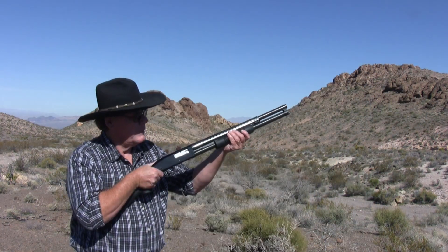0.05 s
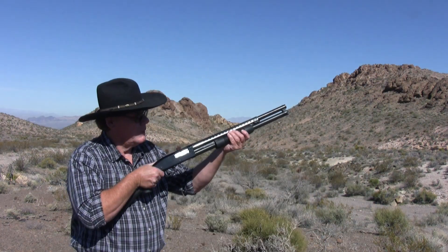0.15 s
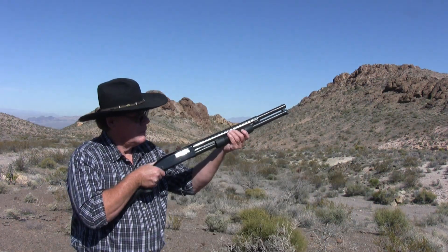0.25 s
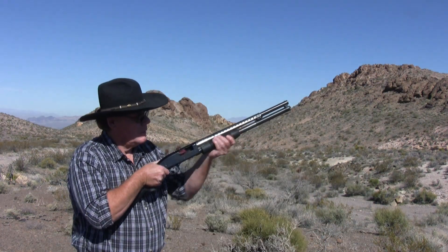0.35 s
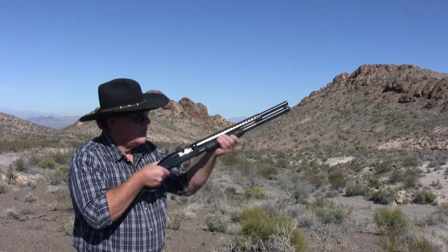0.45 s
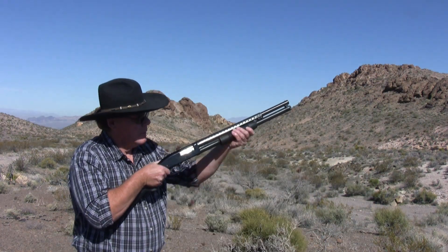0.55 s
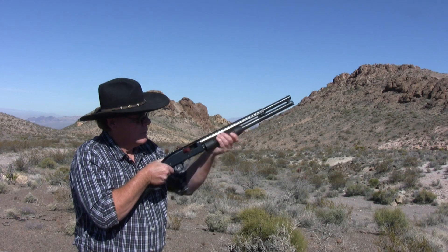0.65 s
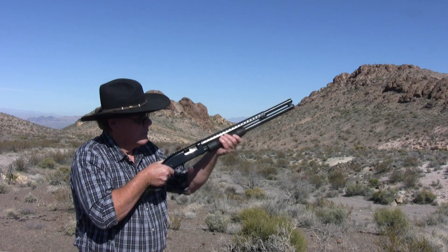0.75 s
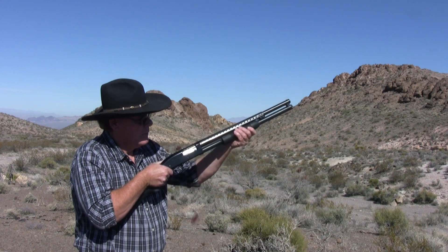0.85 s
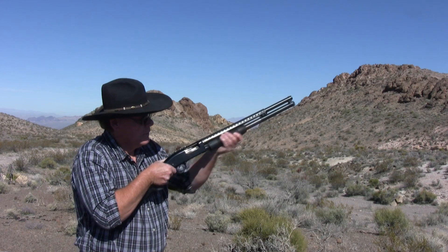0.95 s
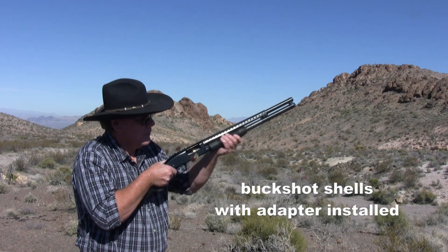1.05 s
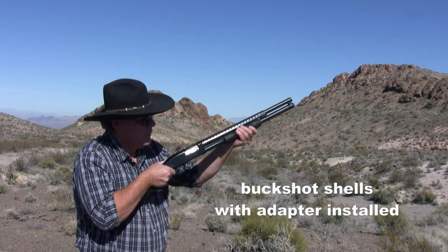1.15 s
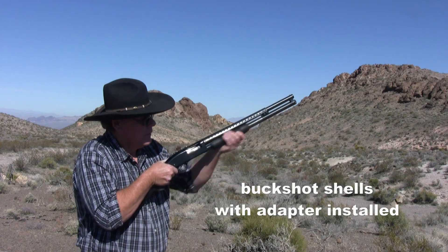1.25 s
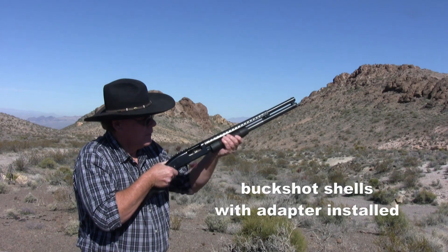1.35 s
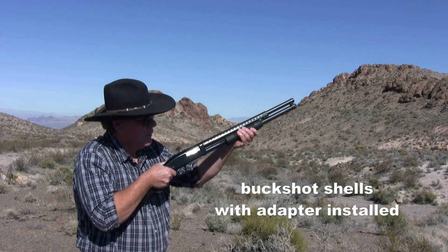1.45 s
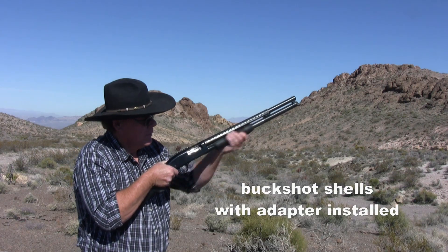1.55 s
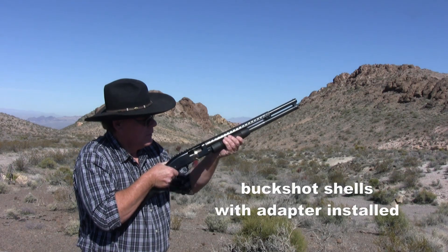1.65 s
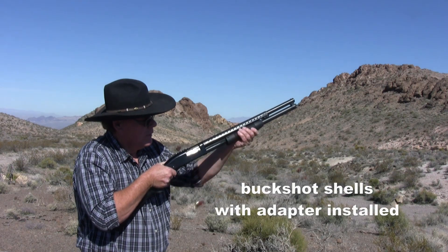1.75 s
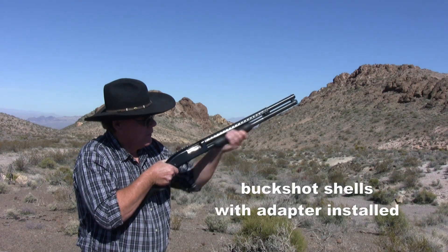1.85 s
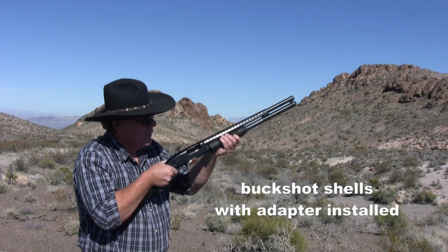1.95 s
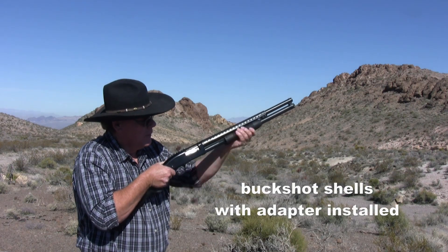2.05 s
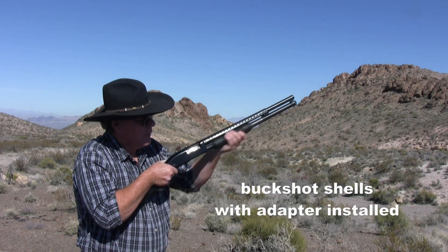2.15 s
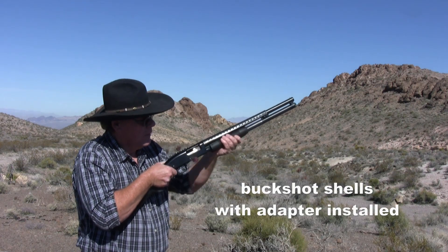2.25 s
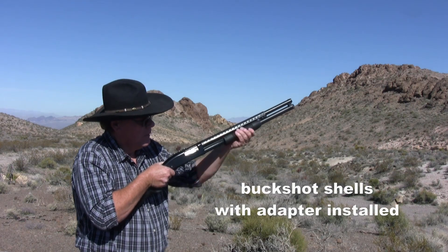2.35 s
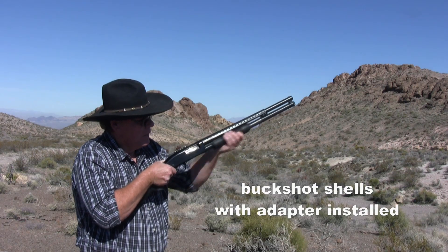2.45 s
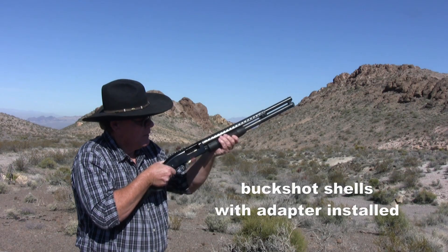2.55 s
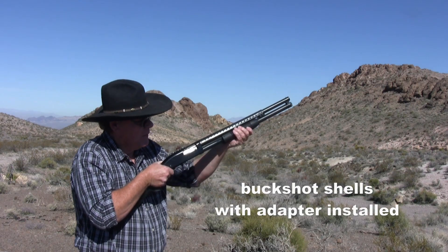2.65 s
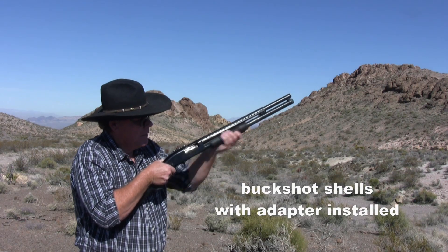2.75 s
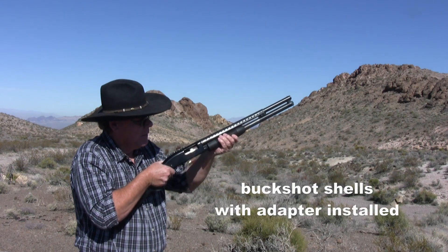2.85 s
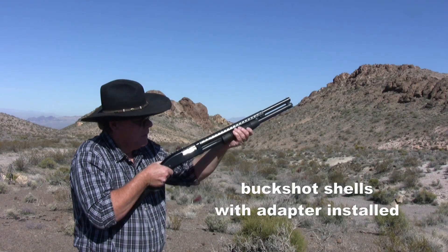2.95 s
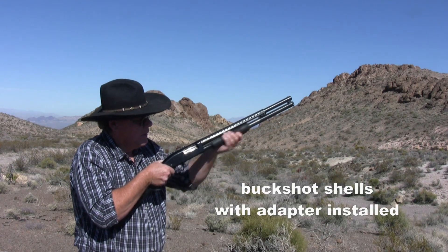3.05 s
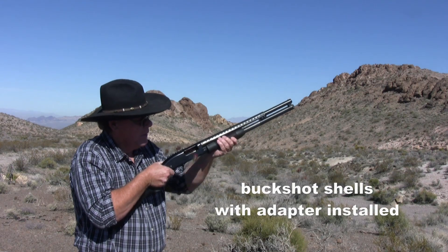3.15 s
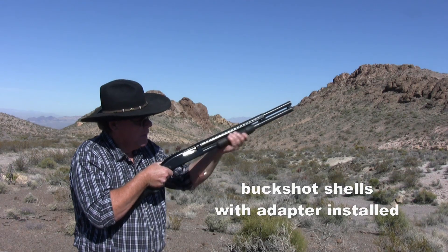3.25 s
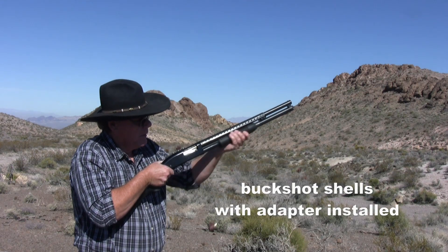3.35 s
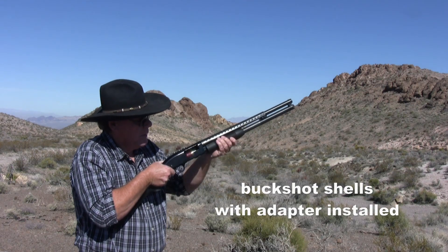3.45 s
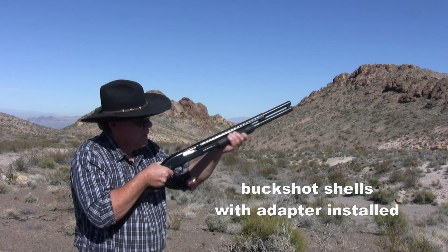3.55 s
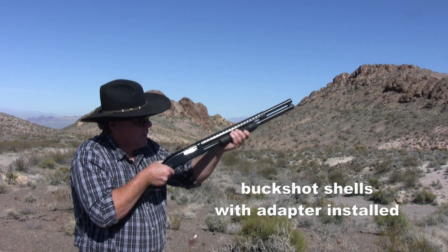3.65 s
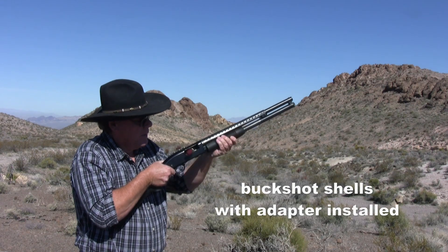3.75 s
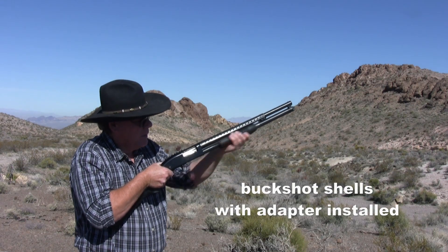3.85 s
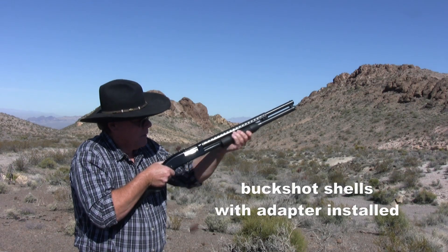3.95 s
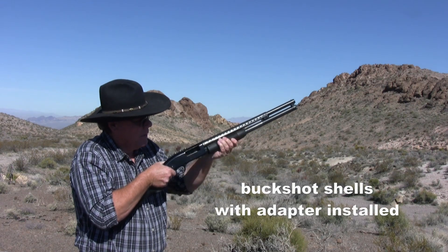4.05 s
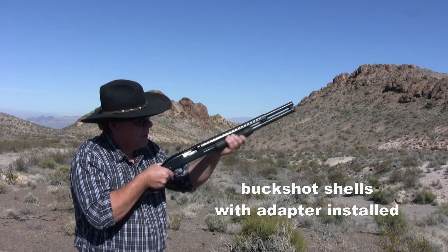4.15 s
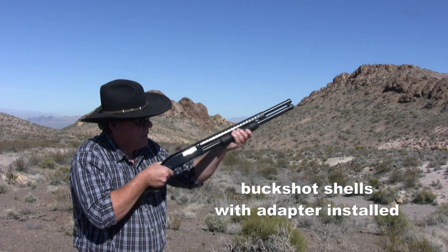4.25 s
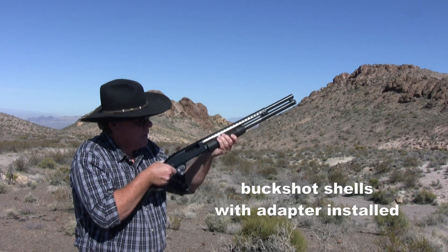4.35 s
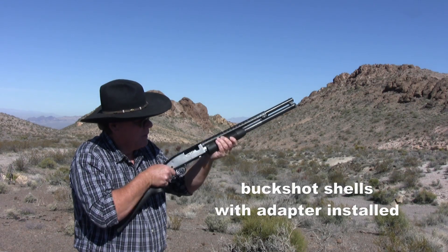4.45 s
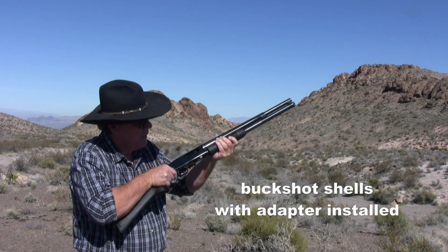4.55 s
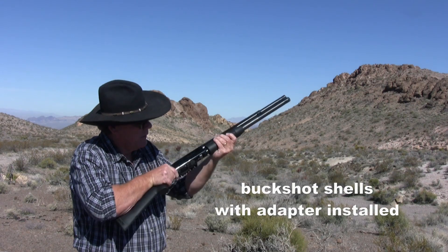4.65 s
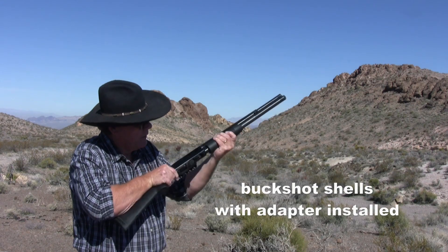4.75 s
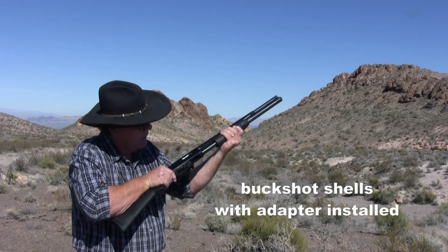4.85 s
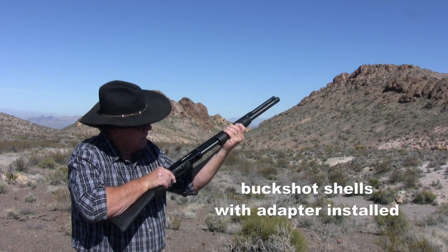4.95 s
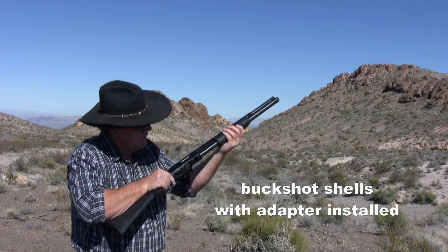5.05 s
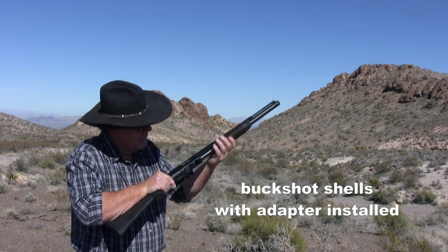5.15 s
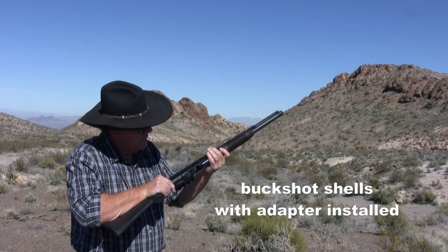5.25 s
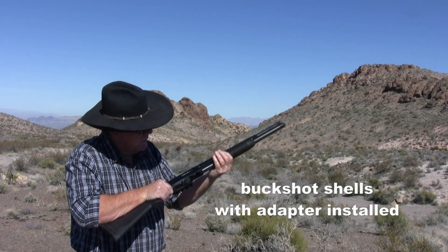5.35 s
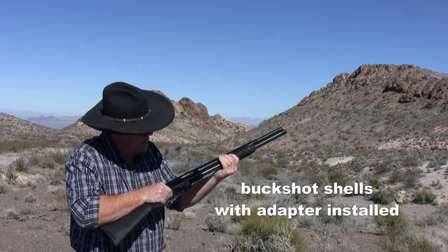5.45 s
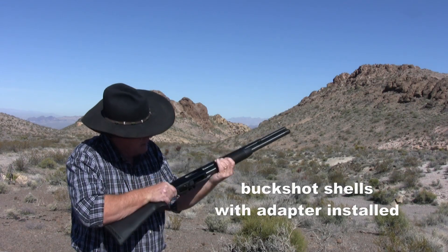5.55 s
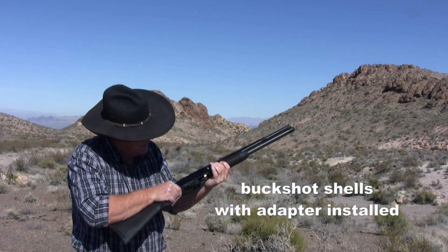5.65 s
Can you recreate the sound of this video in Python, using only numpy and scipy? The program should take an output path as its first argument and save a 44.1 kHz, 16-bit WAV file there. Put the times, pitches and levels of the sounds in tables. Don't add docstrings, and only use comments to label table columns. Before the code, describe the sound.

Low wind rumbles on the microphone for about half a second, with soft grip ticks just before the action starts. From 0.48 seconds a pump shotgun's slide is racked quickly and evenly, roughly every 0.3 seconds. Each pull scrapes and slams into the rear stop with a bright, hard clack and rebound; a shell drops and rattles lightly, then the push home ends in a sharp locking clack with a faint dull stock thud. Eleven such full cycles run until about 3.75, then a twelfth pull and empty strokes clatter on to 4.5. Small ticks and pats follow, a clustered burst of metal clicks and scraping at 4.9-5.06, light touches, and a last cluster around 5.65. The sound is close, dry and slightly clipped, without gunshots or noticeable echo. Hiss and a thin recorder whine sit beneath; wind ducks during racking and swells back near the end.

```python
import sys
import numpy as np
from scipy import signal
from scipy.fft import rfft, irfft
from scipy.io import wavfile
from scipy.ndimage import uniform_filter1d, minimum_filter1d

SR = 44100
rng = np.random.default_rng(int(sys.argv[2]) if len(sys.argv) > 2 else 0)


def generate_wav(sig):
    pcm = np.round(np.clip(np.atleast_2d(sig).T, -1, 1) * 32767).astype(np.int16)
    wavfile.write(sys.argv[1], SR, pcm)


def level_to_linear(level):
    exponent = np.asarray(level, float) / 20
    return 10 ** exponent


N = 250752

# [t/s, wind level/dB, hiss and rustle level/dB]
AIR = [
    (0, -34.5, -56.5),
    (.46, -34, -63),
    (.62, -52, -48),
    (2.1, -57, -45.5),
    (4.4, -56.5, -49),
    (4.7, -47, -63.5),
    (5.14, -46, -56.5),
    (5.3, -38.5, -54),
    (5.56, -40, -52),
    (5.69, -38, -56),
]
# [f/Hz, level/dB per Hz]
WIND = [(12, -68), (20, 7), (81, 2), (240, -14.5), (420, -28.5), (900, -39), (1170, -95)]
# [f/Hz, level/dB per Hz]
HISS = [(150, -12.5), (300, -11.5), (1100, -9.5), (3000, -10.5), (5000, -12.5), (8000, -16.5), (16000, -22)]
MOTOR_HZ = 299.7
MOTOR_ORDERS = range(13, 20)

# [f/Hz, level/dB per Hz]
STEEL = [(180, -27), (300, -17.5), (1280, -7), (2440, -2.5), (4750, -1), (12300, -9.5), (16000, -12.5)]
# [f/Hz, level/dB]
BODY = [(450, -13), (830, -5.5), (1060, 1), (1290, 4), (1480, 2.5)]
# [f/Hz, level/dB]
PARTS = [(2100, 3), (2720, -22), (3750, 9), (4350, -5), (4780, -23), (5500, -11), (8600, 2)]
# [f/Hz, level/dB, t60/s]
BARREL = [(630, -8, .32), (1720, -9, .15), (6760, -5, .35), (7190, -3, .2), (7700, -6, .25)]

# [t/s, knock level/dB, scrape level/dB]
STARTS = [(0.4775, -3.5, -23.5), (0.7880, -7.5, -32.5), (1.0946, -14, -30.5), (1.3984, -13, -37),
          (1.7025, -15, -38.5), (2.0054, -16, -36), (2.3115, -11.5, -40), (2.6118, -19, -38),
          (2.8997, -16, -42), (3.2138, -10.5, -32), (3.5042, -16.5, -45), (3.807, -16, -40)]
# [t/s, unlatch level/dB, cam level/dB]
UNLATCHES = [(0.5059, -8, 8), (0.8116, -5, -2), (1.1185, -10.5, -11), (1.4245, -13, -7), (1.732, -10, -11),
             (2.0317, -11, -8.5), (2.3326, -11, -10), (2.6297, -12, -15), (2.926, -21, -12),
             (3.234, -23, -12.5), (3.5341, -12.5, -14), (3.8365, -11.5, -12)]
# [t/s, stop level/dB, rebound level/dB, rebound delay/ms]
STOPS = [(0.5441, 12.5, 1, 8.9), (0.8407, 5.5, 8, 8.5), (1.1504, 0, 5.5, 7), (1.456, 2.5, 8, 7.8),
         (1.7649, 8.5, 7, 7.9), (2.0635, 5, 11, 7.5), (2.3657, 2, 3, 7.1), (2.6662, -3, 10, 7.7),
         (2.963, 0, -4.5, 9.3), (3.2723, 0, 12, 7), (3.5728, -6, 9.5, 8.1), (3.8800, 0, 5, 9.8)]
# [t/s, drop level/dB, hop level/dB]
DROPS = [(0.59, -11, -15.5), (0.8837, -14.5, -22), (1.1935, -9.5, -21), (1.4995, -13, -14),
         (1.8071, -11, -10.5), (2.1055, -13.5, -16), (2.404, -10, -43), (2.7041, -8.5, -23),
         (2.9999, -8.5, -17), (3.3050, -9, -27), (3.6000, -13, -32)]
# [t/s, catch level/dB, feed level/dB, ramp level/dB]
CATCHES = [(0.6411, -2, -4, -14), (0.958, -8, -7.5, -7.5), (1.264, -8, -7, -5.5), (1.5644, -8, -8, -14),
           (1.8662, -8.5, -6.5, -8), (2.1779, -9, -8, -10), (2.4590, -10.5, -8.5, -7.5),
           (2.7700, -10.5, -10.5, -7.5), (3.0625, -7.5, -7, -7.5), (3.3710, -6.5, -8, -6.5),
           (3.671, -9.5, -7, -11)]
# [t/s, lock level/dB, seat level/dB, scrape level/dB]
LOCKS = [(0.697, 5, -17, -17), (1.0210, 2.5, -5.5, -25), (1.3260, 1.5, -7.5, -24.5),
         (1.6324, -3, -6.5, -26), (1.9328, 5, -7, -24), (2.2398, 3, -7.5, -20.5), (2.528, -4.5, -7.5, -28),
         (2.8379, -3, -7, -24), (3.1323, -1.5, -3.5, -28.5), (3.4365, -3, -6.5, -28.5),
         (3.7410, -6, -8, -26.5)]
THUDS = [-30, -34, -36, -44.5, -38, -35, -38, -39.5, -33.5, -39.5, -38]
CAM_SHARE, SETTLE_S = .3, .0245
HOP_S, HOP_AGAIN_S = .0148, .0245
FEED_SHARE, RAMP_SHARE, SEAT_S = .385, .815, .0072
LOADED = 22

# (level above its stroke/dB, loudest ring f/Hz, receiver body level/dB)
START, UNLATCH, CAM = (0, 3650, -28), (0, 4600, -30), (0, 3920, -31)
STOP, REBOUND, SETTLE = (0, 4900, -14), (0, 4850, -17), (-24, 3600, -26)
DROP, HOP, HOP_AGAIN = (0, 5200, -34), (-3, 6500, -37), (-3, 5100, -18)
CATCH, FEED, RAMP = (0, 5130, -28), (0, 3250, -20), (0, 4500, -25)
LOCK, SEAT = (0, 6870, -10), (0, 4400, -12)
RING_SPREAD = 0.063

# [t/s, peak level/dB, loudest ring f/Hz]
EMPTY = [(3.948, -25, 4480), (3.9613, -27, 4090), (3.9749, -9, 4300), (3.996, -11, 3700),
         (4.0192, -2, 4850), (4.0282, 7, 5100), (4.035, -5, 3000), (4.082, -28, 2990), (4.098, -21, 4500),
         (4.109, -17, 4700), (4.1267, -12, 4900), (4.1525, -13, 4160), (4.174, 8.5, 7080),
         (4.181, -1, 5500), (4.2646, -22.5, 2340), (4.275, -22, 4000), (4.289, -9.5, 3240),
         (4.3123, -7, 2900), (4.337, -5.5, 5460), (4.342, -9, 7500), (4.346, -5, 6300), (4.352, -4.5, 6230),
         (4.385, -27, 3230), (4.3935, -33, 6550), (4.416, -27, 8800), (4.426, -13.5, 7000),
         (4.442, -17, 5300), (4.454, -20, 3700), (4.467, -12.5, 3870), (4.48, -16, 2940),
         (4.4981, -3.5, 4180), (4.5082, -2, 4720)]
# [start t/s, stop t/s, scrape level at start/dB, scrape level at stop/dB]
EMPTY_STROKES = [
    (3.959, 4.04, -32, -25),
    (4.112, 4.185, -29.5, -21.5),
    (4.277, 4.359, -33.5, -25.5),
    (4.407, 4.51, -49, -17),
    (4.915, 4.94, -25.5, -17),
    (4.965, 5.058, -41.5, -17),
    (5.443, 5.451, -60, -37),
    (5.669, 5.678, -17.5, -21.5),
]
# [t/s, level/dB]
EMPTY_LOCKS = [
    (4.185, -42),
    (4.509, -42),
]
# [t/s, peak level/dB, loudest ring f/Hz]
STRAYS = [(0.467, -15, 3630), (0.536, -6.5, 3770), (0.616, -14, 4420), (0.6874, -9, 5000),
          (0.769, -27, 3200), (0.779, -25, 3500), (0.9103, -22, 5580), (0.925, -26, 3000),
          (0.9412, -14.5, 4370), (0.832, -18, 3000), (1.085, -28, 6500), (1.2144, -23, 4630),
          (1.379, -18, 5650), (1.4092, -20, 3060), (1.5562, -11.5, 3640), (1.998, -23, 2890),
          (2.011, -23, 3500), (2.1519, -23, 1460), (2.3076, -12.5, 3600), (2.605, -15, 4340),
          (2.299, -25, 2970), (2.4448, -28, 3380), (2.5945, -43, 2870), (2.7399, -39, 3430),
          (2.948, -28, 3700), (2.89, -27, 2980), (3.097, -11, 4100), (3.2, -13.5, 3440), (3.39, -30, 2830),
          (3.3514, -28, 3500), (3.5125, -19, 4700), (3.649, -27, 3220), (3.862, -21, 3340)]
STRAY_BODY_DB, EMPTY_BODY_DB = -11, -16
PULL_END_DB, PUSH_START_DB = -20.5, -33
PULL_LEAD_S, PUSH_LEAD_S, OVERRUN_S = .001, .026, .003

# [t/s, peak level/dB, loudest ring f/Hz, receiver body level/dB]
HANDLING = [(4.585, -31, 540, -13), (4.6523, -32.5, 5430, -7), (4.719, -39.5, 1220, -4),
            (4.774, -37, 3480, -9), (4.7915, -29, 3940, -11), (4.87, -34.5, 4010, -15),
            (4.88, -25, 3550, -18), (4.8969, -16.5, 3040, -8), (4.932, -3, 3240, -34),
            (4.98, -17, 4070, -1.5), (4.995, -23, 3760, -4), (5.0233, -12, 3000, -20),
            (5.026, -3, 5020, -17), (5.0416, -8, 2950, -9), (5.0467, -5.5, 3640, -16),
            (5.052, -8, 6560, -28), (5.058, -6, 4050, -47), (5.175, -36, 3900, 5),
            (5.199, -25.5, 4120, -12), (5.217, -25, 2840, -5), (5.441, -20.5, 4060, -30),
            (5.453, -16, 3050, -13), (5.6302, -21, 2800, -10), (5.648, -9, 3640, -17),
            (5.6612, -7, 2410, -32), (5.672, -10.5, 4600, -14)]
# [t/s, peak level/dB, loudest ring f/Hz, receiver body level/dB]
TICKS = [
    (.445, -28, 3820, -31),
    (0.4517, -24, 4060, -30),
    (4.572, -49, 700, -12),
    (4.708, -45, 2000, -2),
    (4.727, -48, 8000, -20),
    (4.765, -41, 5540, -19),
    (4.624, -33, 2800, -28),
    (4.812, -38.5, 884, 1),
    (5.159, -39.5, 2360, 0),
    (5.359, -31, 547, -7),
]
SOFT_DB, SOFT_CUT_HZ = -16, 7000

# [t/s, peak level/dB]
JOLTS = [(0.536, -56), (0.587, -49), (0.686, -44.5), (0.79, -47), (0.838, -42), (1.013, -42), (1.106, -45),
         (1.285, -47), (1.378, -46), (1.457, -41), (1.625, -44), (1.734, -50), (1.767, -45), (1.997, -41),
         (2.07, -44), (2.106, -48), (2.312, -47), (2.404, -50), (2.611, -45), (2.702, -46), (2.829, -43.5),
         (3.0, -44.5), (3.215, -49), (3.296, -42), (3.596, -45.5), (3.836, -49), (4.007, -49), (4.116, -51)]
FOREND_HZ, FOREND_T60_S = 238.5, 0.076
# [t/s, peak level/dB, ring f/Hz]
CLANKS = [(0.451, -26.5, 1820), (0.466, -20, 2090), (0.479, -12, 1740), (0.508, -12, 2280),
          (0.544, -7.5, 1310), (0.662, -10, 2090), (0.697, -8, 2260), (0.697, -20, 1296),
          (0.791, -14, 2310), (0.841, -12, 1900), (1.021, -13.5, 1276), (1.151, -4, 1486),
          (1.326, -19, 2280), (1.326, -8.5, 1292), (1.458, -9, 1293), (1.589, -17, 2110),
          (1.618, -30, 2150), (1.633, -10.5, 1286), (1.771, -20, 1560), (1.771, -11.5, 1410),
          (1.893, -15, 2120), (1.932, -11, 1310), (1.997, -28, 1260), (2.065, -10.5, 1437),
          (2.229, -27, 1740), (2.24, -12, 1650), (2.366, -7, 1470), (2.528, -11, 1340), (2.611, -21, 990),
          (2.676, -16, 1430), (2.796, -17, 2080), (2.836, -17, 1365), (2.973, -10.5, 1467),
          (3.088, -17, 1500), (3.118, -16, 1640), (3.132, -10.5, 1278), (3.371, -19, 2010),
          (3.396, -14, 2080), (3.424, -15, 1495), (3.574, -17, 1305), (3.697, -12, 2060), (3.74, -13, 1250),
          (3.88, -9, 1436), (3.973, -15, 2040), (4.019, -14, 1540), (4.181, -19, 1760), (4.181, -8.5, 1470),
          (4.264, -28, 2100), (4.313, -17.5, 1830), (4.337, -23, 2100), (4.508, -13, 1806),
          (4.508, -12, 1775), (4.897, -29, 1700), (4.932, -10, 1720), (5.634, -24, 2250),
          (5.661, -21, 2380)]
CLANK_DB, CLANK_T60_S, CLANK_RISE_S = -4.5, 0.044, 0.00042
# [t/s, peak level/dB, centre f/Hz]
SNAPS = [(4.573, -39, 750), (4.5875, -32, 900), (4.8135, -39, 900), (5.3625, -32, 600), (1.113, -17, 4000),
         (1.116, -8, 3500), (1.998, -9, 3500), (4.6125, -42, 4000), (4.6529, -11.5, 6200),
         (4.657, -29, 6000), (4.6625, -31, 4100), (4.6657, -26, 4000), (4.717, -33, 6000),
         (4.72, -36, 1200), (4.7275, -40, 6500), (4.7715, -27, 5000), (4.7738, -30, 5500),
         (4.7758, -30, 4000), (4.792, -32, 5000), (4.7936, -22, 6540), (4.798, -32.5, 6000),
         (4.808, -36, 5000), (4.9705, -25, 5000), (4.9956, -10, 3900), (5.194, -27, 3000),
         (5.259, -34, 2300)]
SNAP_CYCLES = 0.95
# [t/s, peak level/dB, ring f/Hz]
PINGS = [(0.479, 0, 4460), (0.4907, -13, 3000), (0.5024, -23, 3850), (0.5518, 2, 4570), (0.5665, -12, 4090),
         (0.6278, -13, 4540), (0.6593, -19, 2800), (0.7035, -7, 4800), (0.8626, -24, 2970),
         (0.9498, -13.5, 4100), (1.0282, -13, 3980), (1.1401, -14, 3650), (1.2387, -20, 4220),
         (1.4044, -20, 4690), (1.41, -17, 3140), (1.421, -19, 3270), (1.4653, 2, 4900), (1.584, -23, 3450),
         (1.589, -11, 3540), (1.597, -15, 4690), (2.0512, -16, 3360), (2.1567, -26, 2150),
         (2.1603, -23, 5470), (2.1839, -14, 3680), (2.248, -11.5, 1880), (2.3304, -16, 3100),
         (2.4184, -25, 6680), (2.5416, -14, 2040), (2.5961, -26, 2870), (2.655, -16, 3230),
         (2.7178, -22, 4090), (2.8027, -13.5, 3400), (2.9062, -19, 6850), (2.926, -12, 4180),
         (2.9502, -18, 4900), (2.974, -7, 4630), (3.2153, -14, 5630), (3.2337, -12.5, 5080),
         (3.2964, -16, 2860), (3.319, -21, 2970), (3.38, -28, 2760), (3.4033, -12, 3070), (3.43, -24, 1590),
         (3.51, -19, 6760), (3.5146, -19, 4690), (3.5554, -26, 3680), (3.75, -9.5, 3400),
         (3.908, -13, 7240), (3.913, -17, 2610), (4.117, -21, 4480), (4.1202, -21, 5340),
         (4.1494, -13, 4520), (4.1605, -12, 3460), (4.295, -15, 5860), (4.433, -16, 6680),
         (4.933, -8, 2570), (5.6362, -19, 3640), (5.661, -13, 3530),
         (0.5096, -3, 3600), (0.809, -12, 3080), (.9781, -14, 3490), (1.2211, -15.5, 4380),
          (1.39, -30, 3270), (1.4792, -20, 3830), (1.6937, -26, 4870), (1.7075, -22, 4500),
          (1.7114, -19, 2800), (1.727, -22, 6550), (1.7507, -15, 3740), (2.0863, -17, 3060),
          (2.128, -20, 5600), (2.2534, -16.5, 2660), (2.4453, -19, 3250), (2.6435, -12, 4430),
          (2.6927, -17, 4500), (2.989, -30, 2930), (3.1912, -24, 2440), (3.4941, -29, 2890),
          (3.61, -29, 2630), (3.6966, -13, 3270), (3.7037, -17, 4260), (3.7268, -17, 4390),
          (4.91, -21, 3170)]
PING_RISE_S, PING_T60_S, PING_GRIT = .0004, .009, 1.2
RATTLE_T60_S, RATTLE_RISE_S = .03, .0015
GRAIN_CYCLES, GRAIN_RING_SHARE = 20.7, 0.71


def rms_one(x):
    return x / np.sqrt(np.mean(x ** 2) + 1e-20)


def filtered(x, order, hz, kind):
    return signal.sosfilt(signal.butter(order, hz, kind, fs=SR, output="sos"), x)


def in_time(rows):
    s, *columns = np.transpose(rows)
    return [np.interp(np.arange(N) / SR, s, c) for c in columns]


def samples(s):
    return np.round(s * SR).astype(int)


def drift(rate):
    r = np.exp(-80 * np.pi * rate / SR)
    noise = rng.standard_normal(N // 40 + 2002)
    slow = signal.lfilter([1], [1, -2 * r, r * r], noise)[2000:]
    return np.interp(np.arange(N) / 40, np.arange(len(slow)), rms_one(slow))


def ring(clicks, hz, t60):
    r, w = level_to_linear(-60 / (t60 * SR)), 2 * np.pi * hz / SR
    return signal.lfilter([0, np.sin(w)], [1, -2 * r * np.cos(w), r * r], clicks + 1e-18)


def coloured(x, spectrum):
    hz, db = np.transpose(spectrum)
    bins = np.fft.rfftfreq(N, 1 / SR) + 1
    gain = level_to_linear(np.interp(np.log(bins), np.log(hz), db))
    return rms_one(irfft(rfft(x) * gain, N))


def dying(at, db, t60, rise_s):
    jumps = np.zeros(N)
    jumps[at] = level_to_linear(db)
    lag = np.exp(-1 / (rise_s * SR))
    poles = np.convolve([1, -level_to_linear(-60 / (t60 * SR))], [1, -lag])
    return signal.lfilter([1 - lag], poles, jumps + 1e-18)


def grit(per_s, spread_db):
    sizes = level_to_linear(spread_db * np.minimum(rng.exponential(1, N), 3))
    signs = rng.choice([-1, 1], N)
    return sizes * signs * (rng.random(N) < per_s / SR)


def steel_grains(per_s, spread_db):
    hits = grit(per_s, spread_db)
    part = np.arange(N) % 10
    rings = np.zeros(N)
    for k, hz in enumerate(np.geomspace(1300, 11000, 10)):
        rings += hz * ring(hits * (part == k), hz, GRAIN_CYCLES / hz)
    return coloured(rms_one(hits) + GRAIN_RING_SHARE * rms_one(rings), STEEL)


def air():
    wind_db, hiss_db = in_time(AIR)
    gust = level_to_linear(wind_db + 2.3 * drift(5.2))
    mid, own = (coloured(rng.standard_normal(N), WIND) for _ in range(2))
    wind = gust * (mid * level_to_linear([[-1.6], [1.6]]) + 0.17 * own * [[1], [-1]])
    common, left, right = (coloured(rng.standard_normal(N), HISS) for _ in range(3))
    hiss = level_to_linear(hiss_db + 1.5 * drift(9.5)) * (common + 0.4 * np.array([left, right]))
    t = np.arange(N) / SR
    whine = sum(np.sin(2 * np.pi * (k * MOTOR_HZ * t + rng.random())) for k in MOTOR_ORDERS)
    return wind + hiss + level_to_linear(np.minimum(hiss_db, -63) - 9.0) * whine


def stock(rows):
    s, peak_db, _, body_db = np.transpose(rows)
    puff = rms_one(filtered(rng.standard_normal(N), 2, [220, 1100], "band"))
    puff_db = np.minimum(peak_db + body_db, -36) - 9.0
    return puff * dying(samples(s), puff_db, t60=0.088, rise_s=0.00033)


def forend():
    s, db = np.transpose(JOLTS)
    pushes = np.zeros(N)
    pushes[samples(s)] = level_to_linear(db + 7.0)
    return ring(uniform_filter1d(pushes, size=60, origin=-29), FOREND_HZ, FOREND_T60_S)


def snaps():
    out, t = np.zeros(N + 200), np.arange(-100, 100) / SR
    for s, db, hz in SNAPS:
        i = round(s * SR)
        bell = np.exp(-(2 * t * hz / SNAP_CYCLES) ** 2)
        out[i - 100:i + 100] += level_to_linear(db) * np.cos(2 * np.pi * hz * t) * bell
    return out[:N]


def pings():
    rows = PINGS
    out, t = np.zeros(N + 600), np.arange(-100, 500) / SR
    shape = np.where(t < 0, np.exp(t / PING_RISE_S), level_to_linear(-60 * t / PING_T60_S))
    noise = filtered(rng.standard_normal((len(rows), len(t))), 2, [1300, 8500], "band")
    for (s, db, hz), rough in zip(rows, noise):
        tone = np.sin(2 * np.pi * hz * t)
        out[round(s * SR) - 100:][:len(t)] += level_to_linear(db) * shape * (tone + PING_GRIT * rough)
    return out[:N]


def clanks():
    out, t = np.zeros(N + 2000), np.arange(2000) / SR
    shape = (1 - np.exp(-t / CLANK_RISE_S)) * level_to_linear(-60 * t / CLANK_T60_S)
    for (s, db, hz), (apart, phase) in zip(CLANKS, rng.random((len(CLANKS), 2))):
        upper_hz = hz * (1.08 + 0.17 * apart)
        pair = np.sin(2 * np.pi * hz * t) + 0.49 * np.sin(2 * np.pi * (upper_hz * t + phase))
        out[round(s * SR):][:len(t)] += level_to_linear(db + CLANK_DB) * shape * pair
    return out[:N]


def strokes():
    back = [(start[0] - PULL_LEAD_S, stop[0] + OVERRUN_S, start[2], PULL_END_DB)
            for start, stop in zip(STARTS, STOPS)]
    home = [(catch[0] - PUSH_LEAD_S, lock[0] + OVERRUN_S, PUSH_START_DB, lock[3])
            for catch, lock in zip(CATCHES, LOCKS)]
    return sorted(back + home) + EMPTY_STROKES


def lock_up():
    thuds, strikes = np.zeros((2, N))
    for (_, stop, *_), db in zip(strokes()[1:LOADED:2], THUDS):
        thuds[round((stop - .006) * SR)] = level_to_linear(db)
    for s, db in EMPTY_LOCKS:
        strikes[round(s * SR)] = level_to_linear(db)
    barrel = sum(level_to_linear(db) * ring(strikes, hz, t60) for hz, db, t60 in BARREL)
    push = uniform_filter1d(thuds, size=90, origin=-44) * 30
    thud = ring(push, 195, 0.083) + 0.84 * ring(push, 165, 0.21)
    return level_to_linear(-30.5) * filtered(thud, 2, 130, "high") + barrel


def slide():
    t, level = np.arange(N) / SR, np.zeros(N)
    for start, stop, first_db, last_db in strokes():
        corners = [start - .005, start, stop, stop + 0.036]
        db = np.interp(t, corners, [first_db - 1.0, first_db, last_db, last_db - 36.5])
        level += level_to_linear(db) * (t > start - .005) * (t < stop + .05)
    for back, forward in zip(strokes()[0:LOADED:2], strokes()[1:LOADED:2]):
        level += level_to_linear(-37.5) * (t > back[1]) * (t < forward[0])
    flutter = level_to_linear(2.2 * drift(90))
    scrape = level * flutter * steel_grains(per_s=6000, spread_db=3.5)
    return filtered(scrape, 1, 13000, "low")


def cycles():
    start, start_db, _ = np.transpose(STARTS)
    unlatch, unlatch_db, cam_db = np.transpose(UNLATCHES)
    stop, stop_db, rebound_db, rebound_ms = np.transpose(STOPS)
    drop, drop_db, hop_db = np.transpose(DROPS)
    catch, catch_db, feed_db, ramp_db = np.transpose(CATCHES)
    lock, lock_db, seat_db, _ = np.transpose(LOCKS)
    order = [(START, start, start_db),
             (UNLATCH, unlatch, unlatch_db),
             (CAM, unlatch + CAM_SHARE * (stop - unlatch), cam_db),
             (STOP, stop, stop_db),
             (REBOUND, stop + rebound_ms / 1000, rebound_db),
             (SETTLE, stop + SETTLE_S, 0 * stop),
             (DROP, drop, drop_db),
             (HOP, drop + HOP_S, hop_db),
             (HOP_AGAIN, drop + HOP_AGAIN_S, hop_db),
             (CATCH, catch, catch_db),
             (FEED, catch + FEED_SHARE * (lock - catch), feed_db),
             (RAMP, catch + RAMP_SHARE * (lock - catch), ramp_db),
             (LOCK, lock, lock_db),
             (SEAT, lock + SEAT_S, seat_db)]
    rows = []
    for (above_db, hz, body_db), times, levels in order:
        for s, db in zip(times, levels):
            ring_hz = hz * np.exp(RING_SPREAD * rng.standard_normal())
            rows.append((s, db + above_db, ring_hz, body_db))
    return rows


def knocks(rows, rattle_db):
    s, peak_db, hz, body_db = np.transpose(rows)
    at = np.minimum(samples(s), N - 1)
    luck = rng.standard_normal((len(at), 32))
    steel = coloured(grit(per_s=12000, spread_db=0.5), STEEL)

    crack = rms_one(filtered(steel, 1, 8000, "low"))
    sharp_db = peak_db + 5.9 * np.minimum(np.log2(hz / 2500), 0)
    out = crack * dying(at, np.minimum(sharp_db, 4) - 1.0, t60=0.007, rise_s=0.0003)

    edge = rms_one(filtered(steel, 2, 7500, "high"))
    edge_db = peak_db - 29.0 + 11.0 * np.log2(hz / 4000)
    out += edge * dying(at, edge_db, t60=0.036, rise_s=0.00145)

    rattle = steel_grains(per_s=3500, spread_db=2.0)
    heavy = filtered(rattle, 2, 3300, "low")
    for k, part in enumerate([heavy, rattle - heavy]):
        part_db = 0.81 * np.minimum(sharp_db, 0) + rattle_db + 1.2 * luck[:, 20 + k]
        out += part * dying(at, part_db, RATTLE_T60_S, RATTLE_RISE_S)

    t = np.arange(600) / SR
    for i, db, f in zip(at, peak_db, hz):
        own = level_to_linear(db - 2.5 - 60 * t / 0.011) * np.sin(2 * np.pi * f * t) * (1 - np.exp(-t / 0.00033))
        out[i:i + len(t)] += own[:N - i]

    modes = [(mode, peak_db + body_db - 13.0, .028) for mode in BODY]
    modes += [(mode, peak_db - 30.5, .022) for mode in PARTS]
    for k, ((f, db), drive_db, t60) in enumerate(modes):
        clicks = np.zeros(N)
        clicks[at] = level_to_linear(drive_db + db + 2.1 * luck[:, k]) * np.sign(luck[:, -1 - k % 8])
        out += ring(clicks, f, t60)
    return out


def spread(x):
    side = x * drift(150)
    treble = filtered(side, 2, 7000, "high")
    bass = filtered(side, 2, 600, "low")
    side = level_to_linear(-18.0) * side + level_to_linear(-13.0) * treble + level_to_linear(-13.0) * bass
    return x * level_to_linear([[-.25], [.25]]) + side * [[1], [-1]]


def scene():
    loose = [(*row, STRAY_BODY_DB) for row in STRAYS] + [(*row, EMPTY_BODY_DB) for row in EMPTY]
    firm = [row for row in HANDLING if row[1] >= SOFT_DB]
    soft = [row for row in HANDLING + TICKS if row not in firm]
    cushioned = filtered(knocks(soft, rattle_db=-13.5), 2, SOFT_CUT_HZ, "low")
    racking = knocks(cycles() + loose + firm, rattle_db=-10.5)
    steel = racking + cushioned + slide() + clanks() + snaps() + pings()
    steel = filtered(steel, 4, 330, "high")
    return spread(steel + lock_up() + forend() + stock(soft)) + air()


def band_limit(x):
    return signal.sosfilt(signal.butter(12, 16330, fs=SR, output="sos"), x)


def record(dry):
    peak = -minimum_filter1d(-np.abs(dry).max(axis=0), size=89)
    gain = uniform_filter1d(1 / np.maximum(peak / .95, 1), size=45)
    cut = signal.cheby2(14, 80, 16450, fs=SR, output="sos")
    mix = signal.sosfilt(cut, dry * gain)
    return band_limit(mix)


dry = scene()
out = record(dry)
generate_wav(out)
```